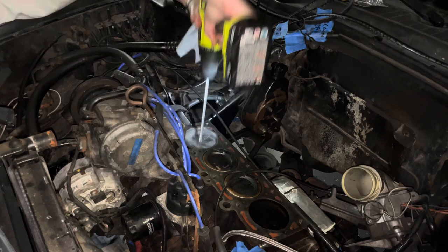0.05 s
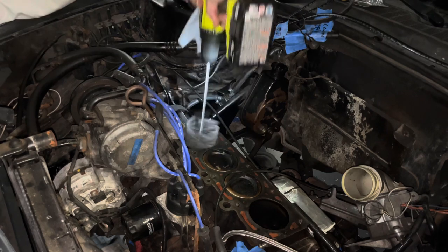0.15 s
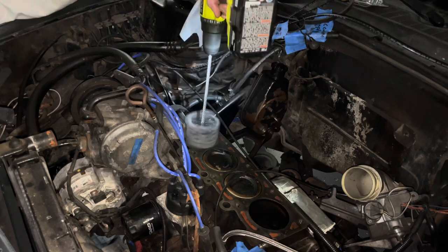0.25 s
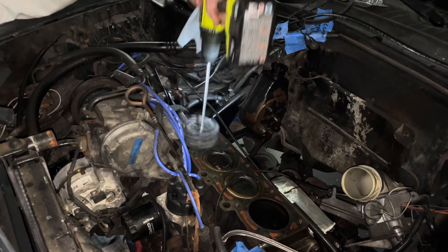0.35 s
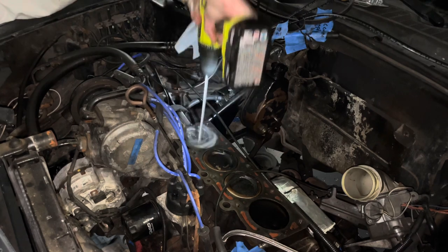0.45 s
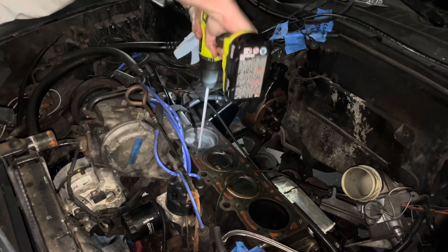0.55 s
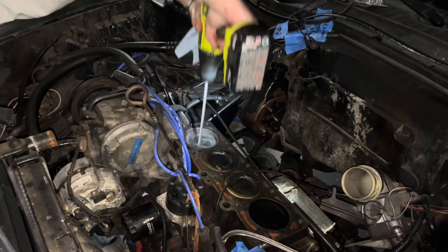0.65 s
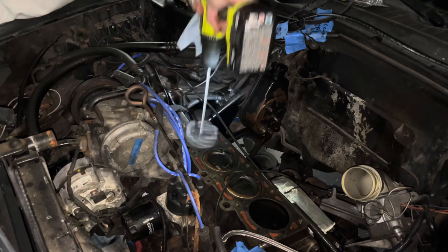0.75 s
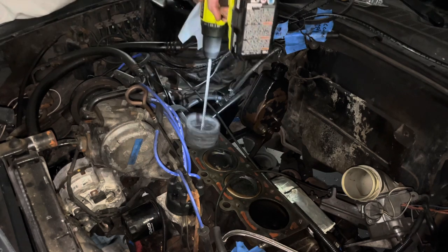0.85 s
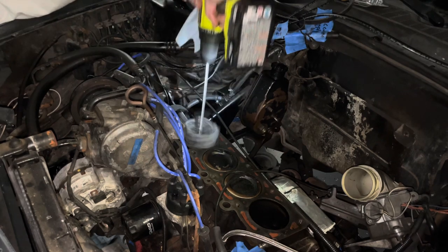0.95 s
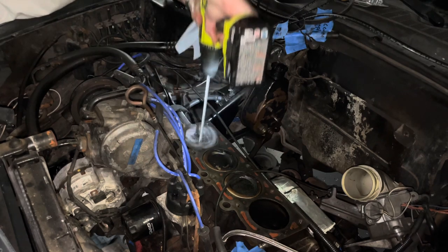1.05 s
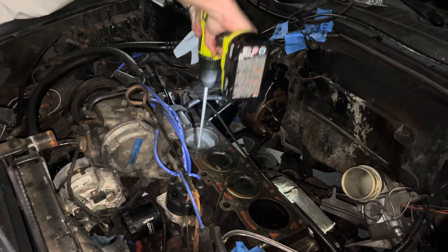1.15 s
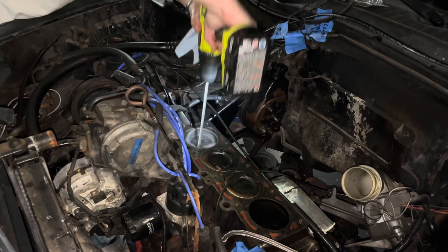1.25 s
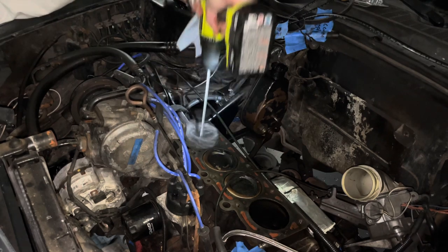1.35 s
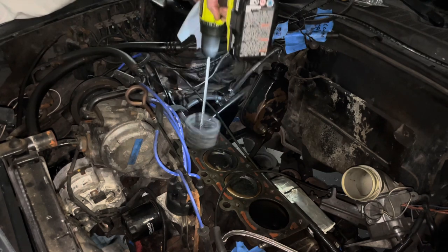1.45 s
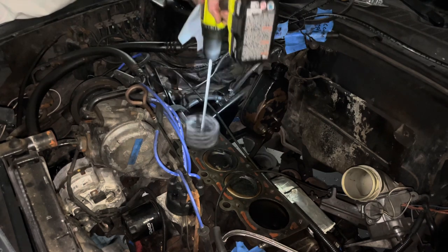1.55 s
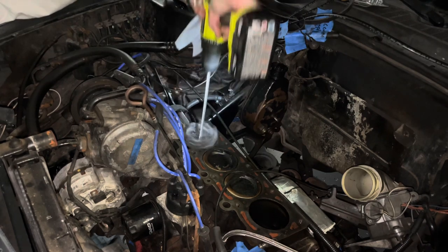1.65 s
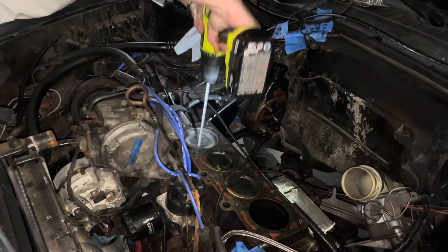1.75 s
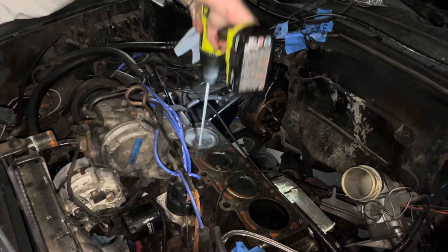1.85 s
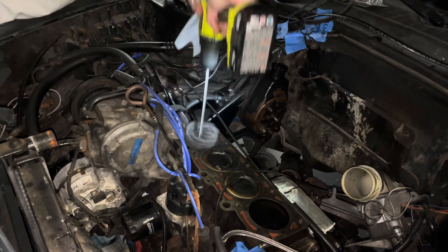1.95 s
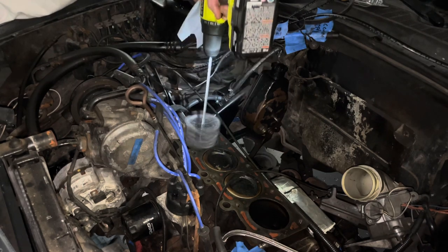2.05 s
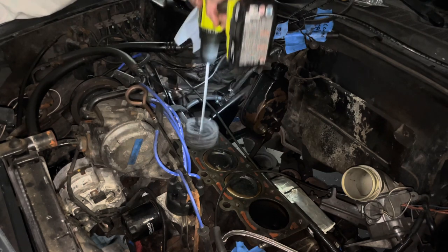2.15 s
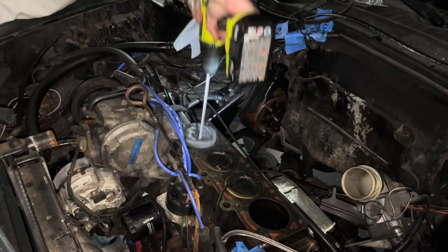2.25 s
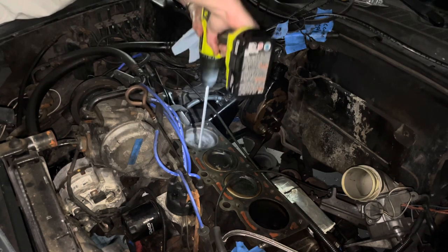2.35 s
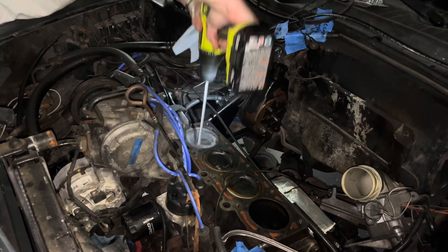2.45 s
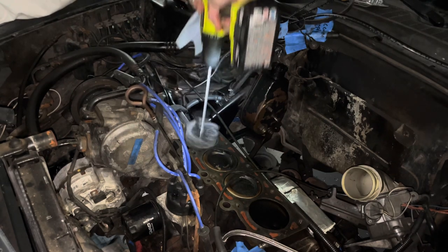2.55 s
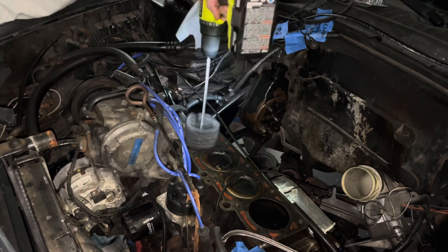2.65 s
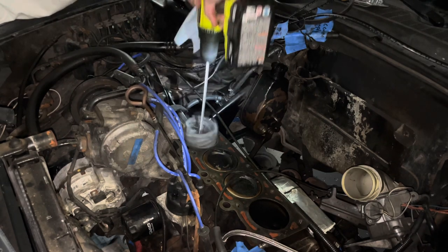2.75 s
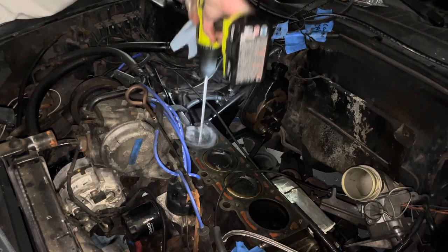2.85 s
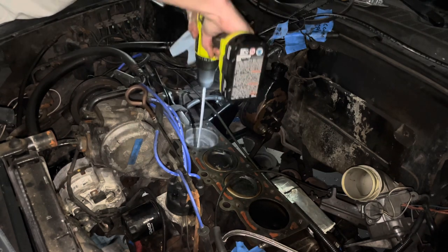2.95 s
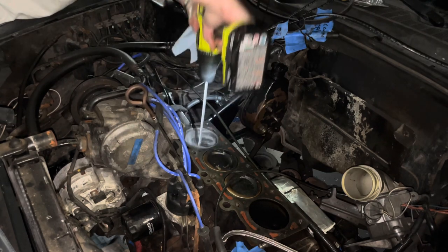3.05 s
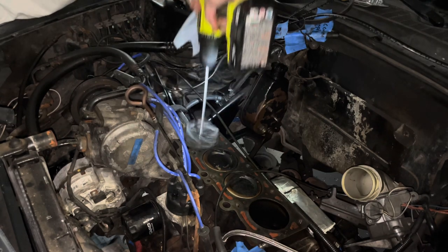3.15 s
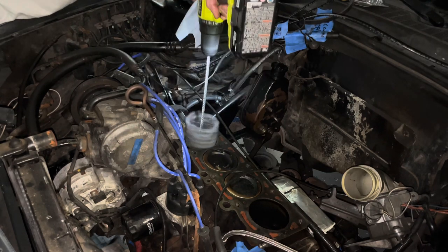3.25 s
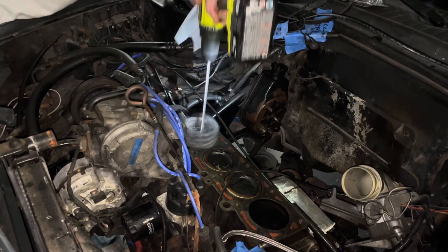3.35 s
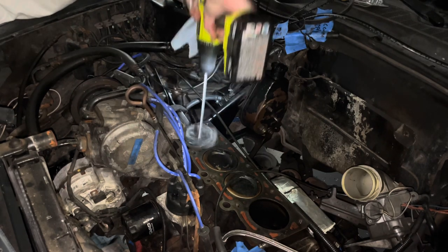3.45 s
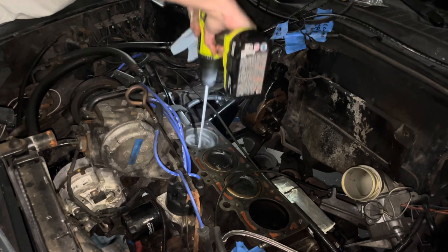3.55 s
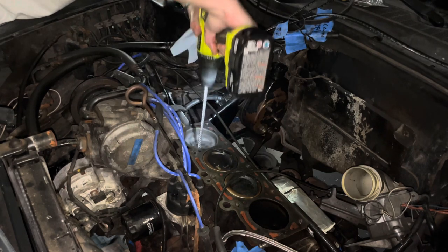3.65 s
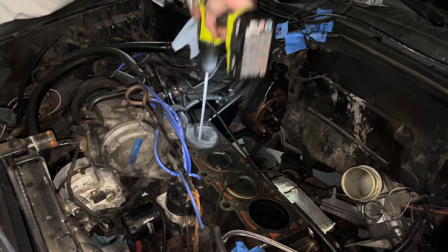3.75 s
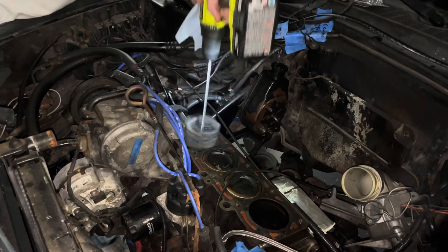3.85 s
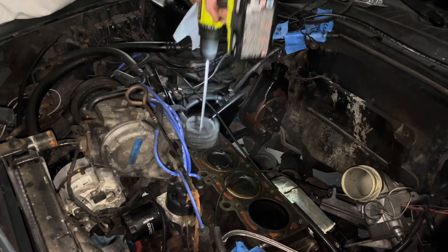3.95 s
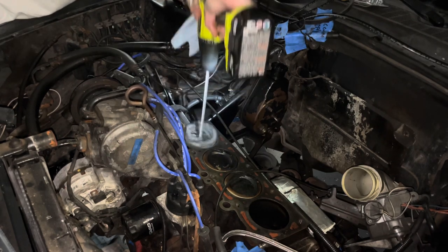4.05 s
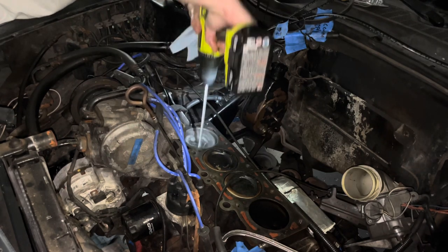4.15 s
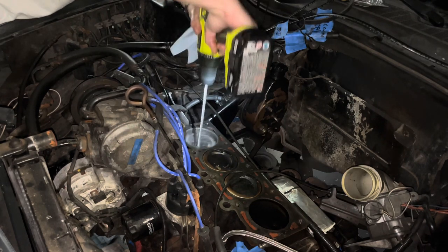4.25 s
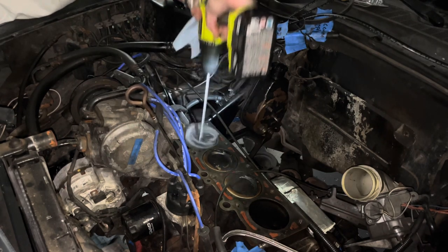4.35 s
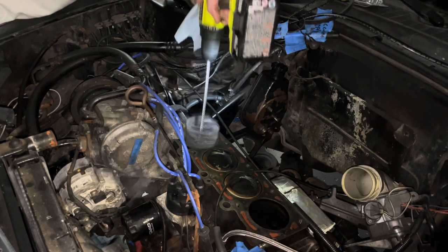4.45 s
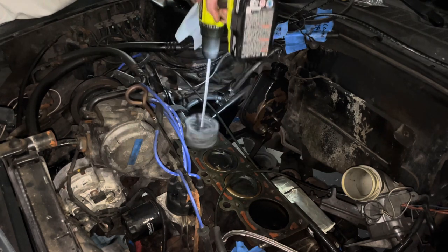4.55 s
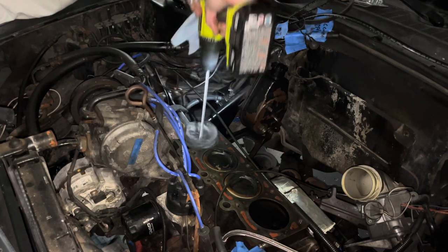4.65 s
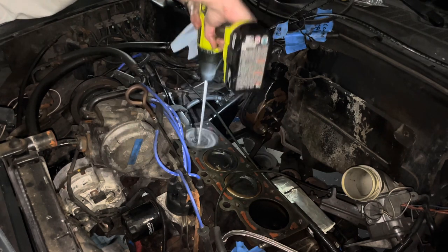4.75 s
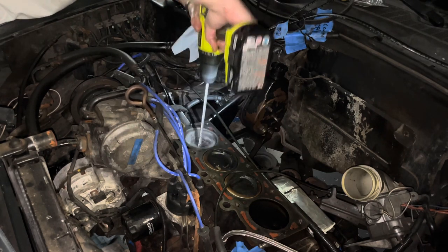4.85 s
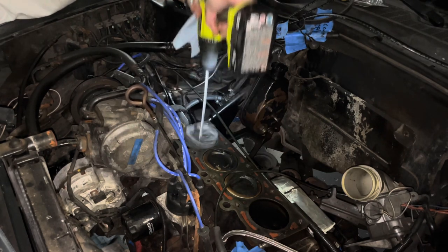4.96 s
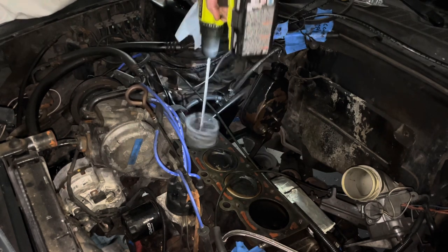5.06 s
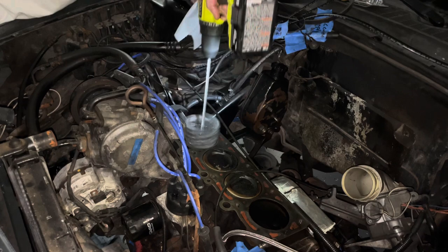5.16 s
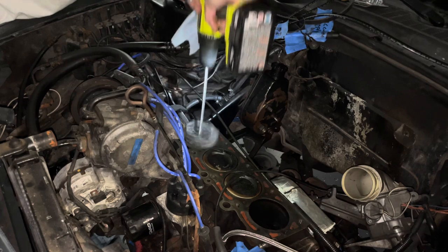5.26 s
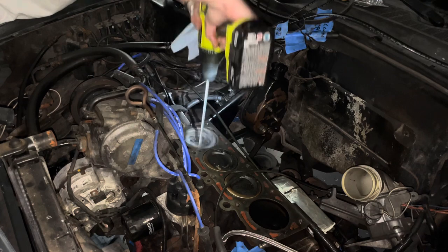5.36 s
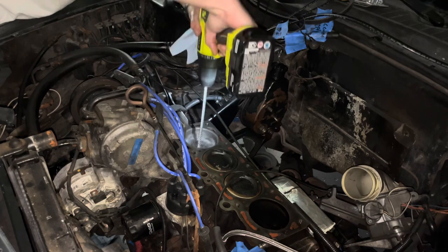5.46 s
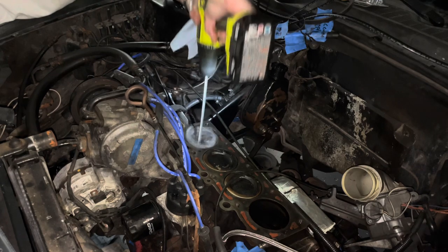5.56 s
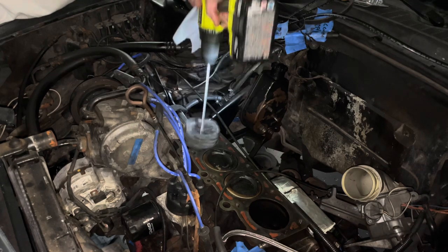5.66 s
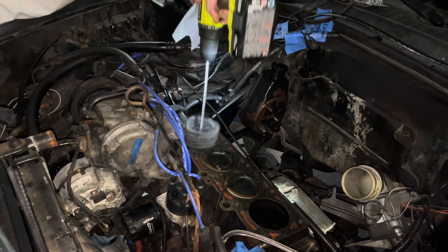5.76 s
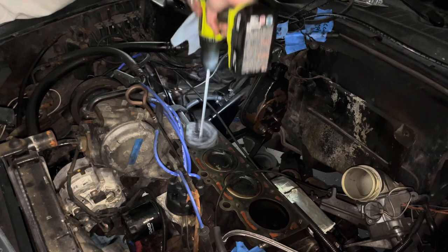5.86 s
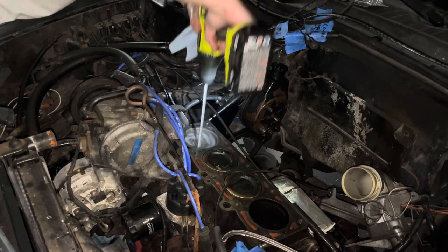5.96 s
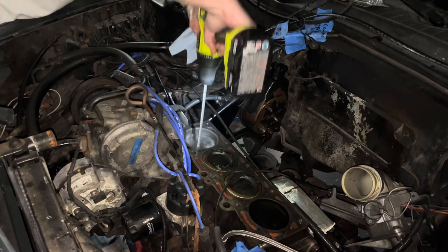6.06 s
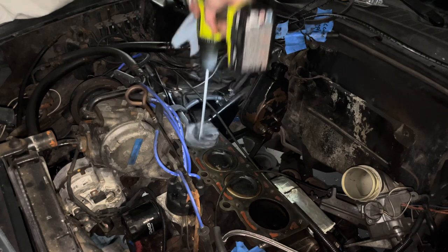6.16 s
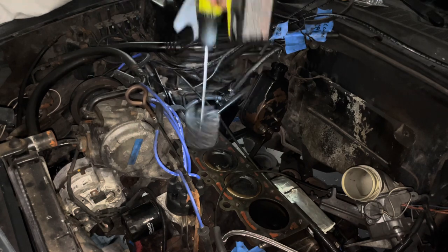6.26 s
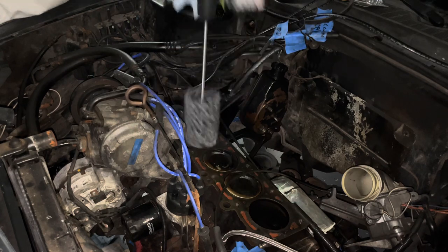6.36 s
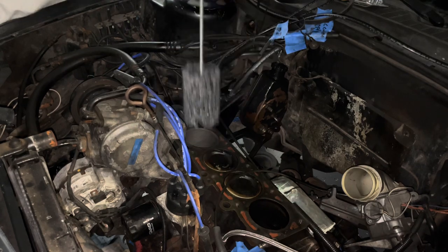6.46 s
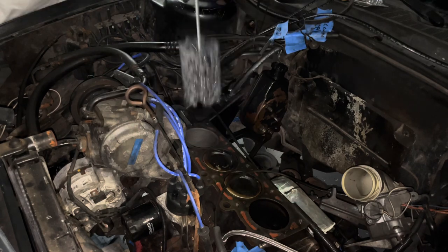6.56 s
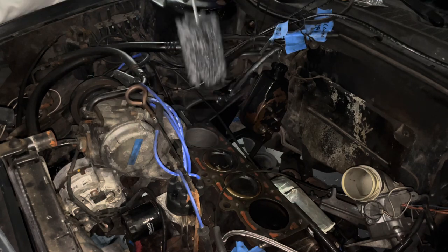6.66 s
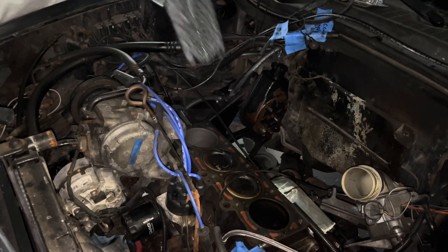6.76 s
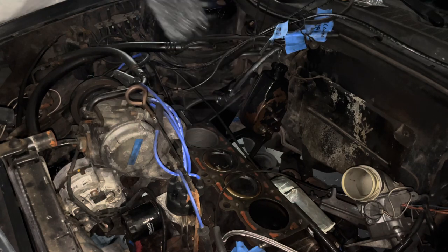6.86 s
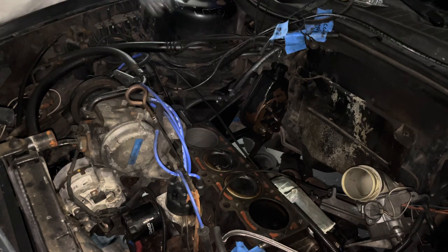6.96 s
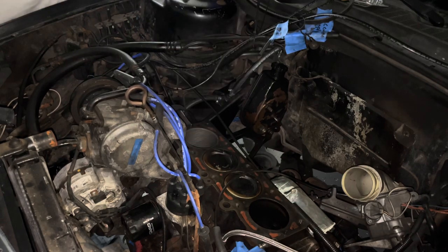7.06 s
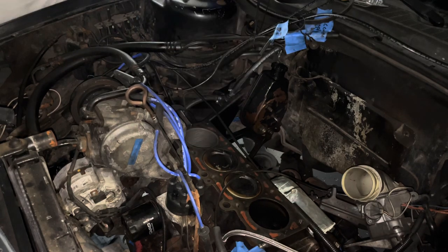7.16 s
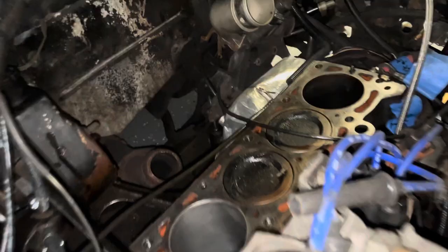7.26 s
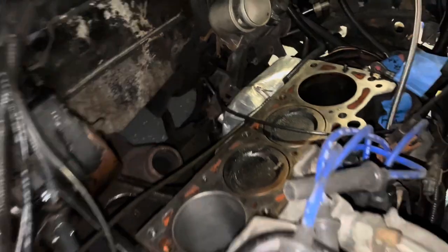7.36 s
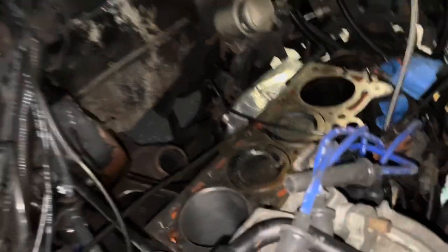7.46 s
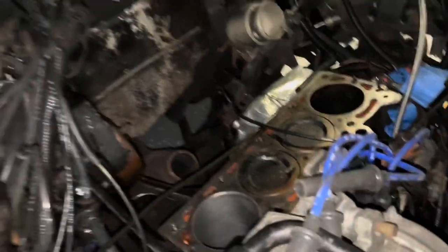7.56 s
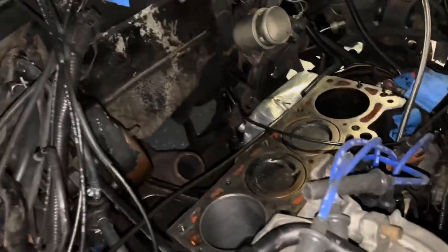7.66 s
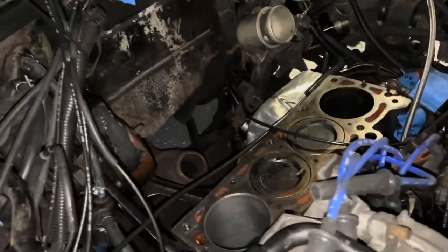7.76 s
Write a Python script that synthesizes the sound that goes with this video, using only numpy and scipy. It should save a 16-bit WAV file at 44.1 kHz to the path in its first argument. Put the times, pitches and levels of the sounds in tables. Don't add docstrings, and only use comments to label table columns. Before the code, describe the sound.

A cordless drill whines and wavers while an abrasive hone scrapes steadily inside an engine cylinder, then ticks out, stops, and is set down with soft knocks.

```python
import sys
import numpy as np
from scipy import signal
from scipy.fft import rfft, irfft, next_fast_len
from scipy.io import wavfile
from scipy.ndimage import uniform_filter1d

SR = 44100
rng = np.random.default_rng(int(sys.argv[2]) if len(sys.argv) > 2 else 0)


def file_out(sig):
    cols = np.atleast_2d(sig).T
    lim = np.clip(cols, -1, 1)
    pcm = np.round(lim * 32767).astype(np.int16)
    wavfile.write(sys.argv[1], SR, pcm)


def boost(x):
    u = np.asarray(x, float) / 20
    return 10 ** u


N = 344994
T = np.arange(N) / SR

# start_s, pitch_hz, level_db
HUM = [(0.0, 58.5, -38), (0.06, 59, -41.5), (0.26, 59, -39.5), (0.33, 58.6, -42), (0.48, 58.2, -39.5),
       (0.8, 58.8, -38), (0.94, 58.4, -44), (1.35, 59.3, -39.5), (1.41, 58.4, -44), (1.55, 58.7, -40),
       (1.83, 58.6, -36), (2.0, 58.3, -43), (2.07, 58.6, -39), (2.33, 58.5, -38.5), (2.57, 58.6, -48),
       (2.59, 58.6, -42), (2.87, 58.5, -39), (3.05, 58.6, -43), (3.13, 58.5, -39), (3.42, 58.5, -37.5),
       (3.61, 58.6, -43.5), (3.68, 58.6, -40), (3.96, 58.5, -40.5), (4.09, 58.6, -48), (4.14, 58.6, -43),
       (4.42, 58.6, -37), (4.6, 58.6, -40), (4.9, 58.8, -37.5), (5.1, 58.5, -41.5), (5.14, 58.3, -47),
       (5.27, 58.6, -39), (5.34, 58, -42), (5.44, 58.3, -40.5), (5.66, 58.6, -43.5), (5.84, 58.8, -39.5),
       (6.03, 58.5, -37), (6.16, 58.1, -41.5), (6.32, 58.6, -37.5), (6.4, 58.2, -40), (6.58, 58.5, -38),
       (6.64, 58.5, -41), (6.71, 59, -50), (6.77, 58.6, -51), (6.82, 58.4, -42), (6.97, 58.6, -38),
       (7.21, 58.6, -37.5), (7.23, 59, -43), (7.27, 57.8, -37), (7.32, 57.35, -55), (7.36, 57.3, -48),
       (7.45, 56.8, -46), (7.71, 56.4, -53), (7.78, 57.5, -77), (7.8, 57.7, -59), (7.82, 58, -51)]
# pitch_hz, width_hz, level_db
HUM_OVERTONES = [(89, 4.3, -63), (117, 4, -63), (175, 5.8, -63), (195.8, 5, -68)]
# start_s, air_db, rustle_db
AIR_AND_RUSTLE = [(6.6, -49, -67), (6.66, -53, -73), (6.796, -52, -83), (6.848, -51.5, -69.5),
                  (7.054, -49.5, -75), (7.146, -53.5, -87), (7.228, -50, -90), (7.33, -62, -86),
                  (7.51, -55.5, -77), (7.54, -57, -92.5), (7.662, -57.5, -87.5), (7.786, -53, -72),
                  (7.82, -64, -85)]
# frequency_hz, density_db (per Hz)
AIR_SPECTRUM = [(40, -15), (65, -6), (90, -1), (150, -9), (230, -12.5), (330, -17.5), (420, -12.5),
                (600, -21), (900, -21), (1300, -26.5), (1900, -37.5), (4000, -52), (15000, -63)]
# frequency_hz, side_minus_mid_db
AIR_WIDTH = [(60, -11.5), (110, -10), (200, -3), (380, -1), (700, 1.5), (1290, -1), (2380, 0), (4400, -4),
             (8120, 6), (15000, -7.5)]
# frequency_hz, density_db (per Hz)
RUSTLE_SPECTRUM = [(1000, -13), (2000, 6), (3800, -1.5), (5200, 1), (6000, -8.5), (6700, -3), (7500, -9),
                   (10000, -11), (14000, -8.5), (16000, -16.5)]
# frequency_hz, side_minus_mid_db
ECHO_WIDTH = [(100, -16), (300, 0), (1000, 2), (2000, -4.5), (4000, 4.5), (8000, 13), (15000, -18.5)]
# start_s, peak_db, ring_hz
BENCH_KNOCKS = [
    (6.785, -56, 484),
    (6.836, -45, 566),
    (6.869, -49, 483),
    (6.894, -49, 568),
    (6.946, -46.5, 570),
    (7.004, -46, 565),
    (7.048, -55, 565),
    (7.085, -47, 563),
    (7.185, -57, 658),
]
# start_s, scrape_db, rumble_db, hiss_db
HONE_LEVELS = [(0.0, -34.5, -40.5, -35), (0.03, -37.5, -41, -35), (0.14, -37, -41, -34.5),
               (0.3, -37.5, -40.5, -39.5), (0.38, -36, -39.5, -31.5), (0.41, -38.5, -41, -39.5),
               (0.45, -37.5, -41.5, -37), (0.9, -36.5, -40.5, -35.5), (1.13, -38.5, -42, -36.5),
               (1.32, -36.5, -39.5, -35), (1.43, -38, -41, -36), (1.47, -37.5, -40.5, -35.5),
               (2.47, -37, -41, -36.5), (2.51, -37, -40, -34), (3.01, -38, -40.5, -37),
               (3.08, -38, -42.5, -37), (3.17, -37, -39, -34), (3.33, -38, -43.5, -37),
               (3.37, -36.5, -38.5, -35.5), (3.42, -38.5, -41, -34), (3.46, -37.5, -41, -37),
               (3.78, -36.5, -40, -35), (4.87, -37, -40.5, -36), (5.21, -37.5, -39.5, -36.5),
               (5.39, -37, -41, -37.5), (5.48, -37, -40, -34.5), (5.53, -36.5, -43, -35),
               (5.62, -38, -37.5, -35.5), (6.02, -37, -42, -35.5), (6.14, -37, -38.5, -35.5),
               (6.2, -36.5, -41.5, -30), (6.29, -37, -39, -35.5), (6.36, -45.5, -41.5, -29.5),
               (6.39, -47, -51.5, -33.5), (6.43, -58, -52.5, -47.5)]
# frequency_hz, density_db (per Hz)
RUMBLE_SPECTRUM = [(150, -29.5), (330, -15.5), (520, -7.5), (700, -8.5), (900, -1), (1100, -3),
                   (1250, -6.5), (1500, 0), (1800, -5.5), (2300, -25.5)]
# frequency_hz, density_db (per Hz)
SCRAPE_SPECTRUM = [(1500, -25), (2100, -4), (2700, -1.5), (3400, 0.5), (4000, 1), (4600, 0), (5300, -3.5),
                   (6200, -3), (7500, -6.5), (9000, -37.5)]
# frequency_hz, density_db (per Hz)
HISS_SPECTRUM = [(6500, -14), (8000, 0), (9500, 4.5), (11000, 5), (13000, 4), (14500, 3.5), (16000, -5.5),
                 (17500, -36)]
# start_s, peak_db
RIM_FLICKS = [(0.3581, -17), (1.3386, -17.5), (6.1574, -23), (6.1994, -19), (6.2183, -14.5),
              (6.2264, -17.5), (6.2454, -18), (6.3074, -10), (6.3424, -17.5), (6.362, -18), (6.3634, -13),
              (6.3757, -12.5), (6.384, -18)]
# start_s, mesh_hz, mesh_db, second_order_db, shaft_sideband_db
GEAR_MESH = [(0.0, 1858.0, -43, -40, -46.5), (0.085, 1857.0, -40.5, -44.5, -42),
             (0.17, 1933.0, -39.5, -46, -49), (0.255, 2004.0, -44, -44.5, -43.5),
             (0.34, 1968.0, -41.5, -43, -42.5), (0.425, 1929.0, -48, -36, -41.5),
             (0.51, 1925.0, -47, -32.5, -43), (0.595, 1865.0, -37.5, -45, -34),
             (0.68, 1837.0, -46.1, -49.5, -45.5), (0.765, 1897.0, -42, -46, -43),
             (0.85, 1960.0, -37, -40, -51.8), (0.935, 1951.0, -37, -51, -36.5),
             (1.02, 1937.0, -45.5, -34, -39.5), (1.105, 1933.0, -49, -33, -37),
             (1.19, 1893.0, -35.5, -32, -39), (1.275, 1864.0, -41.5, -36, -46.5),
             (1.36, 1891.0, -39, -41, -40.5), (1.445, 1956.0, -38, -43, -58.0),
             (1.53, 1990.0, -47.5, -40.4, -47), (1.615, 1951.0, -39.5, -37, -42),
             (1.7, 1926.0, -55.5, -36, -43.5), (1.785, 1916.0, -40.5, -29.5, -39.2),
             (1.87, 1864.0, -42, -40, -43.5), (1.955, 1886.0, -39.5, -42.5, -45.5),
             (2.04, 1968.0, -40, -44, -51.5), (2.125, 1982.0, -42.5, -41, -45.5),
             (2.21, 1931.0, -40.5, -49.5, -42.4), (2.295, 1925.0, -56, -39.5, -43),
             (2.38, 1925.0, -40.5, -29.5, -40.9), (2.465, 1872.0, -40, -37, -44),
             (2.55, 1872.0, -44, -42.5, -44), (2.635, 1942.0, -37, -39, -51.5),
             (2.72, 1960.0, -36.6, -37.5, -37), (2.805, 1958.0, -40.5, -44.5, -34.5),
             (2.89, 1934.0, -54.5, -33, -36), (2.975, 1896.0, -36, -34, -44),
             (3.06, 1867.0, -42.5, -35.5, -39), (3.145, 1850.0, -39.2, -41.5, -45),
             (3.23, 1912.0, -37, -44.5, -48.5), (3.315, 1988.0, -42.5, -43.5, -45.5),
             (3.4, 1964.0, -40, -40, -36), (3.485, 1912.0, -41.5, -32.5, -37.5),
             (3.57, 1910.0, -39, -33.5, -43), (3.655, 1859.0, -39, -44, -32.5),
             (3.74, 1838.0, -45, -43, -42), (3.825, 1891.0, -42, -42.8, -52),
             (3.91, 1958.0, -38.5, -35, -41.5), (3.995, 1955.0, -39.5, -46.5, -37.5),
             (4.08, 1939.0, -51.5, -36, -38), (4.165, 1934.0, -48, -30, -39.8),
             (4.25, 1881.0, -35.5, -38, -43.5), (4.335, 1874.0, -34.5, -35, -46),
             (4.42, 1892.0, -37.5, -40.4, -44.8), (4.505, 1948.0, -37, -46.5, -43),
             (4.59, 1974.0, -40, -49.5, -44), (4.675, 1955.0, -37, -41, -35),
             (4.76, 1914.0, -40, -31.5, -41.5), (4.845, 1905.0, -34, -26.5, -40.7),
             (4.93, 1873.0, -37.5, -39, -54), (5.015, 1887.0, -37, -42, -51),
             (5.1, 1958.0, -39, -39.5, -44.5), (5.185, 1976.0, -38.8, -47.0, -53),
             (5.27, 1942.0, -44, -43, -37.5), (5.355, 1922.0, -47.5, -32.5, -43.5),
             (5.44, 1900.0, -36.5, -34.5, -42), (5.525, 1864.0, -41.5, -42.7, -36.5),
             (5.61, 1872.0, -38.5, -42, -38.5), (5.695, 1928.0, -39, -49, -43.5),
             (5.78, 1932.0, -39, -40.5, -50), (5.865, 1938.0, -37, -38.0, -44.5),
             (5.95, 1932.0, -47, -33.5, -42.5), (6.035, 1884.0, -37.5, -35.5, -49),
             (6.12, 1868.0, -42, -40, -44.5), (6.205, 1884.0, -40, -39.5, -44.5),
             (6.29, 1937.0, -49, -50, -57.5)]
# multiple_of_mesh_rate, level_db, blur_hz
WEAK_ORDERS = [(.49, -52, 6), (1.47, -60.5, 10), (2.82, -56, 13), (2.909, -52, 14), (3.0, -60, 12),
               (3.82, -61, 23), (3.909, -45, 20), (4.0, -56.5, 15)]
# frequency_hz, gain_db
SUM_RESPONSE = [(3000, -0.5), (6000, 2), (7500, 3), (7700, -6.5), (8250, -5), (8350, -51), (8900, -51.5),
                (9000, -12), (9600, 3), (11000, 3), (15600, 0.5), (15800, -71.5)]
# frequency_hz, gain_db
DIFFERENCE_RESPONSE = [(300, 0.5), (1000, 0), (2500, 1.5), (4000, -0.5), (6000, -6), (7500, -1),
                       (9500, 1.5), (11700, -5.5), (12000, -18.5), (12500, -58)]


def level(x, db):
    return x * boost(db) / np.sqrt(np.mean(x ** 2))


def curves(table):
    start_s, *columns = np.transpose(table)
    return [np.interp(T, start_s, column) for column in columns]


def colour(x, points, lag_s=0.):
    size = next_fast_len(len(x))
    hz = np.arange(size // 2 + 1) * SR / size
    point_hz, db = np.transpose(points)
    gain = boost(np.interp(np.log(hz + 1), np.log(point_hz), db))
    delay = np.exp(-2j * np.pi * hz * lag_s)
    return irfft(rfft(x, size) * gain * delay, size)[:len(x)]


def walk(rate):
    hold = int(SR / rate)
    steps = np.repeat(rng.standard_normal(N // hold + 1), hold)
    smooth = uniform_filter1d(uniform_filter1d(steps, hold), hold)
    return 1.298 * smooth[:N]


def band_level(x, lo_hz, hi_hz):
    band = signal.butter(4, [lo_hz, hi_hz], "band", fs=SR, output="sos")
    return x / np.std(signal.sosfilt(band, x))


def running(stop_s, fall_s):
    return np.exp(-np.maximum(T - stop_s, 0) / fall_s)


def grit(spread_db, flicker_db, rate):
    ticks = rng.standard_normal(N) * boost(spread_db * rng.exponential(1, N))
    return ticks * boost(flicker_db * walk(rate))


def garage():
    hz, hum_db = curves(HUM)
    air_db, rustle_db = curves(AIR_AND_RUSTLE)
    phase = 2 * np.pi * np.cumsum(hz + .5 * walk(7.4)) / SR
    hum = np.sqrt(2) * boost(hum_db + .8 * walk(20)) * np.sin(phase)
    for f, width_hz, db in HUM_OVERTONES:
        peak = signal.iirpeak(f, f / width_hz, SR)
        hum += level(signal.lfilter(*peak, rng.standard_normal(N)), db)
    air_db = np.where(T < AIR_AND_RUSTLE[0][0], -56, air_db)

    def air():
        noise = colour(rng.standard_normal(N), AIR_SPECTRUM)
        return band_level(noise, 60, 440) * boost(air_db + 1.4 * walk(6))

    def rustle():
        noise = colour(grit(2.5, 1.5, 28), RUSTLE_SPECTRUM)
        return band_level(noise, 2500, 7500) * boost(rustle_db + 0.5)

    mid = air() + rustle()
    side = colour(air() + rustle(), AIR_WIDTH)
    return hum * np.array([[.75], [1.25]]) + np.array([mid + side, mid - side])


def echoes(x, bay_db, bay_t60, room_db, room_t60):
    t = T[:SR]

    def tail():
        bay = rng.standard_normal(SR) * np.exp(-np.log(1000) * t / bay_t60)
        bay = level(bay, bay_db)
        room = rng.standard_normal(SR) * np.exp(-np.log(1000) * t / room_t60)
        room = room * np.minimum(t / 0.0081, 1)
        room = level(colour(room, [(200, 3.5), (3000, 2.5), (15000, -14)]), room_db)
        return (bay + room) / np.sqrt(SR)

    place = np.pi * (T * 1.651 + 0.29 * walk(3))
    shares = [np.sqrt(2 / 3) * np.cos(place + k * np.pi / 3) for k in range(3)]

    def field():
        return sum(signal.fftconvolve(x * share, tail())[:N] for share in shares)

    mid = field()
    side = colour(field(), ECHO_WIDTH)
    return np.array([mid + side, mid - side])


def knocks():
    out, t = np.zeros(N), T[:SR // 8]
    envelope = np.exp(-np.log(1000) * t / .1) * (1 - np.exp(-t / 0.005))
    for s, db, hz in BENCH_KNOCKS:
        ring = np.sin(2 * np.pi * hz * t)
        ring += .6 * np.sin(2 * np.pi * 1.4 * hz * t)
        ring += .7 * np.sin(2 * np.pi * 0.6 * hz * t)
        start = int(s * SR)
        out[start:start + len(t)] += boost(db - 0.5) * ring * envelope
    return out


def rim_flicks():
    ticks = np.zeros(N)
    for s, db in RIM_FLICKS:
        ticks[int(s * SR)] = boost(db + 10.5) * rng.choice([-1, 1])
    return colour(ticks, [(2000, -30), (6000, 1), (11000, 6), (16000, -3), (17500, -33.5)])


def hone():
    scrape_db, rumble_db, hiss_db = curves(HONE_LEVELS)
    scrape = band_level(colour(grit(2.04, 0.78, 9), SCRAPE_SPECTRUM), 1990, 3430)
    rumble = band_level(colour(grit(1.57, 0.66, 12), RUMBLE_SPECTRUM), 400, 1700)
    hiss = band_level(colour(grit(2.6, 0.76, 11), HISS_SPECTRUM), 10120, 15500)
    friction = scrape * boost(scrape_db + 0.07)
    friction += rumble * boost(rumble_db - 1.5)
    friction += hiss * boost(hiss_db + 2.0)
    return friction * running(stop_s=6.42, fall_s=.008) + rim_flicks()


def gears():
    hz, mesh_db, second_db, side_db = curves(GEAR_MESH)
    phase = 2 * np.pi * np.cumsum(hz) / SR

    def order(k, db, blur_hz, flutter_db):
        slip = 2 * np.pi * np.cumsum(blur_hz * walk(60)) / SR
        return np.sqrt(2) * boost(db + flutter_db * walk(25)) * np.sin(k * phase + slip)

    out = order(1, mesh_db, blur_hz=3, flutter_db=2.5)
    out += order(2, second_db, blur_hz=7, flutter_db=1.0)
    out += order(21 / 11, side_db, blur_hz=7, flutter_db=3.5)
    for k, db, blur_hz in WEAK_ORDERS:
        out += order(k, db, blur_hz, flutter_db=2.5)
    return out * running(stop_s=6.33, fall_s=0.013)


def scene():
    tool = gears() + hone() + knocks()
    flat = [(20, 0), (20000, 0)]
    direct = np.array([tool, colour(tool, flat, lag_s=52e-6)])
    reverberant = echoes(tool, bay_db=-8, bay_t60=0.055, room_db=-15, room_t60=0.57)
    return boost(0.5) * direct + reverberant + garage()


def top_cut(x):
    return signal.sosfilt(signal.butter(12, 17070, fs=SR, output="sos"), x)


def record(dry):
    mid = colour((dry[0] + dry[1]) / 2, SUM_RESPONSE)
    side = colour((dry[0] - dry[1]) / 2, DIFFERENCE_RESPONSE)
    change_s, half_width_s = 7.303, .025
    fade = np.clip(np.abs(T - change_s) / half_width_s - .15, 0, 1)
    return top_cut(np.array([mid + side, mid - side]) * fade)


dry = scene()
out = record(dry)
file_out(out)
```